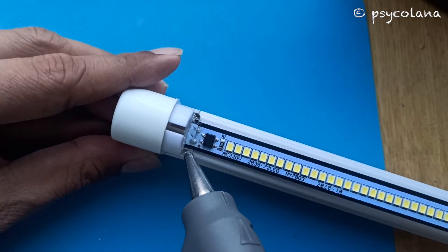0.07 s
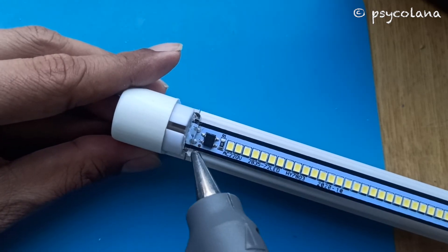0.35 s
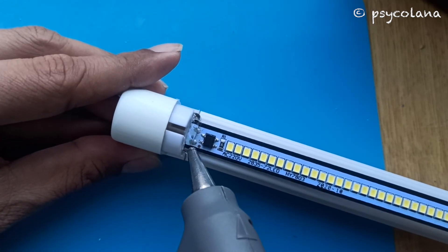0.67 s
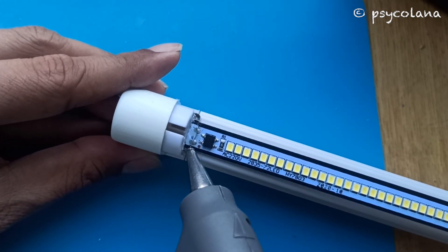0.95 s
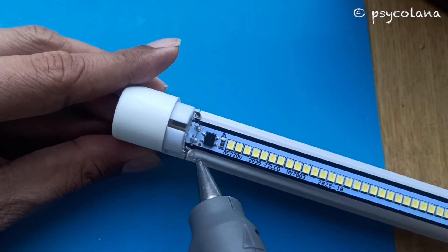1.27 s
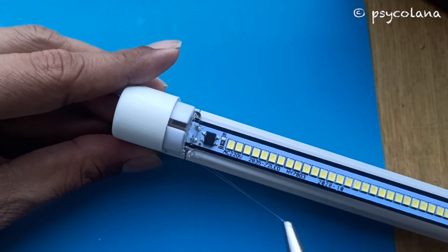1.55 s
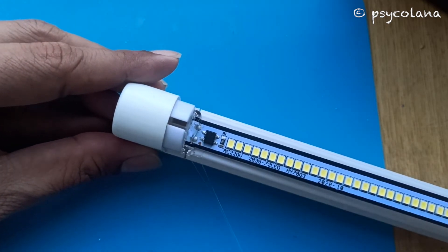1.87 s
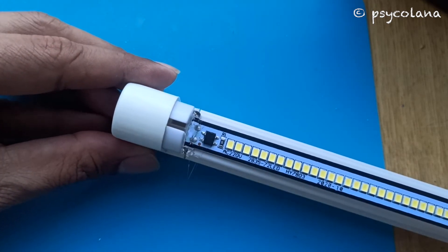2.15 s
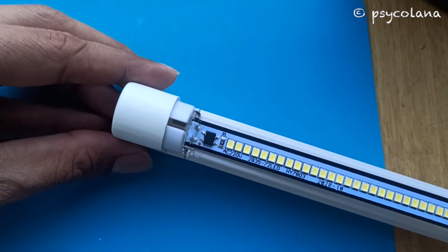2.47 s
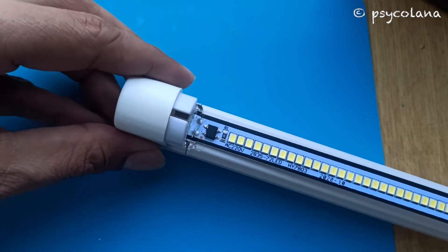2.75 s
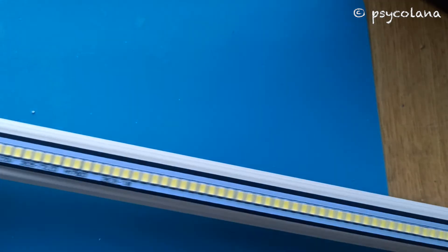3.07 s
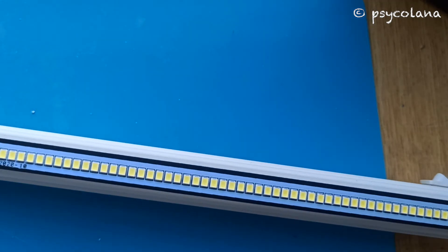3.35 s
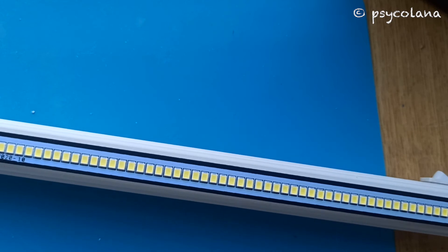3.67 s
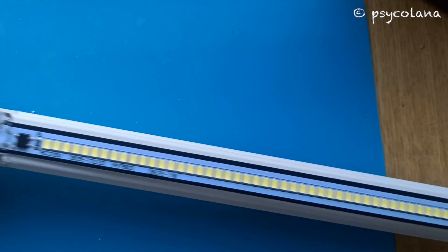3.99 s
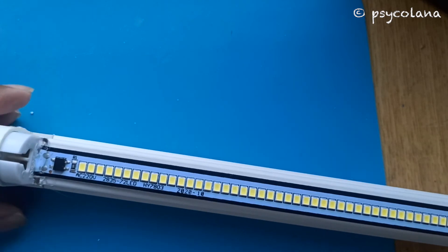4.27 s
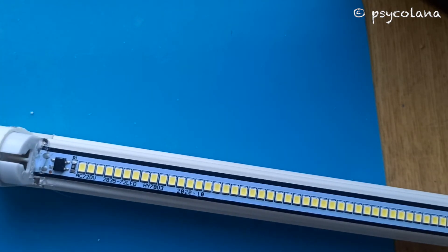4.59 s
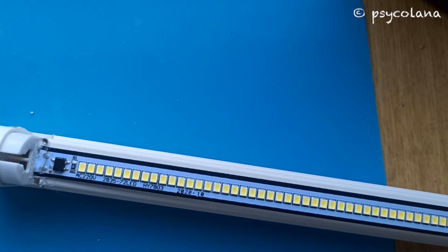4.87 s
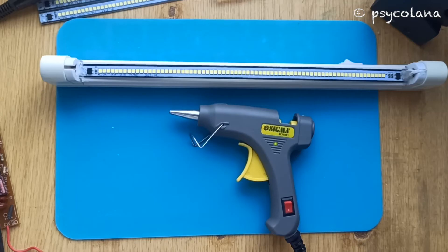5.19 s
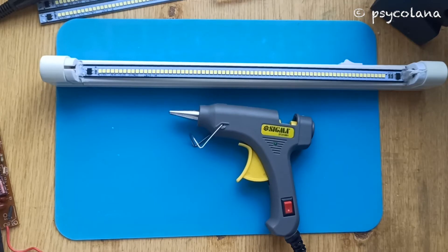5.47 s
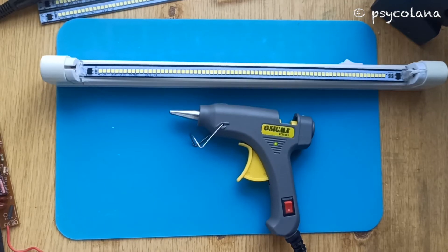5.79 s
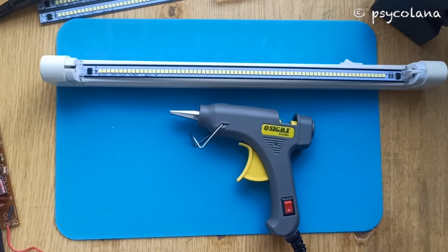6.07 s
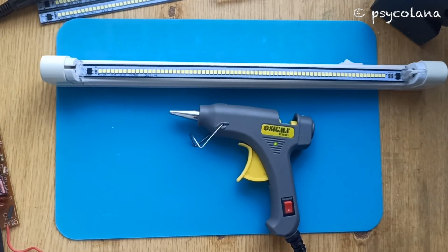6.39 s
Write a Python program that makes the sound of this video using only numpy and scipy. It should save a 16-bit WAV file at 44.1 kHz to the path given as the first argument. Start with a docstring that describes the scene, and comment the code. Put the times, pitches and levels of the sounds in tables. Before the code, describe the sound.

A hot glue gun ticks faintly on a plastic tube, which then slides over a rubber mat and lands with a hollow knock.

```python
"""A quiet room: a hot glue gun dabs at a plastic tube lamp holder on a rubber mat, heard close up.
The nozzle ticks on the thin shell. Fingers scrape and shift the holder; it sticks and slips over
the mat and is set down with a hollow knock. Skin and sleeves rustle faintly over the room's low
rumble and the microphone's hiss."""
import sys
import numpy as np
from scipy import signal
from scipy.fft import rfft, irfft
from scipy.io import wavfile
from scipy.ndimage import uniform_filter1d

SR = 44100
rng = np.random.default_rng(int(sys.argv[2]) if len(sys.argv) > 2 else 0)


def transcribe(u):
    """Save the signal u as a 16-bit wav file named by the first command-line argument.

    u: samples, shape (n,) or (channels, n), limited to [-1, 1]; the rate is SR.
    q: integer samples, one column per channel.
    """
    v = np.clip(np.atleast_2d(u).T, -1, 1)
    q = np.round(v * 32767).astype(np.int16)
    wavfile.write(sys.argv[1], SR, q)


N = 287972
TIME = np.arange(N) / SR
SIDES = np.array([[.5], [-.5]])  # splits a left-right difference

# left-right likeness of diffuse sound: freq_hz, correlation
COHERENCE = [(30, 0.44), (70, 0.032), (150, 0.86), (300, 0.3), (600, 0.099), (1200, 0.029), (16000, 0.012)]


def amp(db):
    """Decibels to gain."""
    return 10 ** (np.asarray(db) / 20)


def unit(x):
    """Scales to rms 1."""
    return x / np.sqrt(np.mean(x ** 2) + 1e-20)


def curve_at(points, hz):
    """Interpolates on a log-frequency axis."""
    freq_hz, value = np.transpose(points)
    return np.interp(np.log(hz + 1), np.log(freq_hz + 1), value)


def add(mix, start_s, sound):
    """Mixes a sound in at start_s."""
    part = mix[:, round(start_s * SR):][:, :sound.shape[1]]
    part += sound[:, :part.shape[1]]


def colour(x, spectrum, tilt_db_oct=0):
    """Filters by a spectrum, tilted about 4 kHz."""
    hz = np.fft.rfftfreq(x.shape[-1], 1 / SR)
    octaves = np.log2(np.maximum(hz, 800) / 4000)
    return irfft(rfft(x) * amp(curve_at(spectrum, hz) + tilt_db_oct * octaves), x.shape[-1])


def diffuse_noise(spectrum):
    """Stereo noise, partly alike in the bass, unrelated in the treble."""
    # left-right balance: freq_hz, pan_db
    balance = [(50, 0.5), (200, 0.6), (1000, 0.5), (2500, -1), (5000, 3), (14000, 4.5)]
    hz = np.fft.rfftfreq(N, 1 / SR)
    left, other = rfft(rng.standard_normal((2, N)))
    same = curve_at(COHERENCE, hz)
    right = same * left + np.sqrt(1 - same ** 2) * other
    pair = np.array([left, right]) * amp(SIDES * curve_at(balance, hz))
    return unit(irfft(pair * amp(curve_at(spectrum, hz)), N))


def wander(n, per_s):
    """Random curve through per_s Gaussian knots a second."""
    knots = rng.standard_normal(int(n / SR * per_s) + 3)
    return np.interp(np.arange(n) / SR * per_s, np.arange(len(knots)), knots)


def stroke(t, peak_s, level_db, swell_s, fade_s):
    """Bell envelope with separate swell and fade."""
    return amp(level_db) * np.exp(-((t - peak_s) / np.where(t < peak_s, swell_s, fade_s)) ** 2)


def resonate(x, hz, width_hz):
    """Resonance that follows the curve hz."""
    carrier = np.exp(2j * np.pi * np.cumsum(hz) / SR)
    pole = np.exp(-np.pi * width_hz / SR)
    return 2 * (carrier * signal.lfilter([1 - pole], [1, -pole], x / carrier)).real


def background(rumble_db=-54.5, hiss_db=-64, drop_db=-5.5, drop_at_s=2.435, drop_takes_s=0.0057,
               rise_db_per_s=0.18, waver_db=0.7):
    """Room rumble creeps up, microphone hiss swells at the end; both step down once, together."""
    # room tone: freq_hz, gain_db
    rumble_spectrum = [(15, -39), (25, -31), (45, -15.5), (80, -5), (130, -3), (168, 0.93), (250, -7),
                       (330, -8), (480, -13.5), (750, -15), (1100, -19.5), (2300, -25.5), (4500, -25.5),
                       (7000, -26.5), (8400, -31), (11000, -44)]
    # microphone hiss: freq_hz, gain_db
    hiss_spectrum = [(8000, -19), (11000, -2), (12500, -14), (13500, -7.5), (16000, -21.5)]
    since_s = TIME - drop_at_s
    step_db = drop_db * np.clip(since_s / drop_takes_s + .5, 0, 1)
    rumble = diffuse_noise(rumble_spectrum)
    rumble *= amp(rumble_db + step_db + rise_db_per_s * since_s + waver_db * wander(N, per_s=11))
    swell = stroke(TIME, peak_s=7.5, level_db=-69, swell_s=1, fade_s=0.18)
    return rumble + diffuse_noise(hiss_spectrum) * (amp(hiss_db + step_db) + swell)


def holder_body(force, rise_s=0.0067, highpass_hz=105, split_hz=500):
    """The hollow holder's low modes reach each microphone port with their own phase and level."""
    # body modes: freq_hz, relative_db, t60_s, port_phase_rad, pan_db
    modes = [(109, -40, 0.13, .1, -1), (177.5, -7, 0.046, 0.17, 2.5), (256, -4.5, 0.031, 0.27, 1.5),
             (311.3, 4.5, 0.021, 0.73, 3.5), (366.7, -2.5, 0.031, 0.99, 1.5), (417, -17.5, 0.08, 1.8, 1),
             (626, -13.5, 0.045, 1.5, 3), (694, -8.5, 0.034, 1.5, -2.5)]
    t = np.arange(SR // 2) / SR
    ring = np.zeros((2, len(t)))
    for hz, db, t60_s, phase_rad, pan_db in modes:
        polarity = np.sign(split_hz - hz)  # upper modes swing against the lower ones
        envelope = amp(db + SIDES * pan_db - 60 * t / t60_s)
        ring += polarity * envelope * np.sin(2 * np.pi * hz * t + SIDES * phase_rad)
    # a small body radiates little deep bass
    highpass = signal.butter(3, highpass_hz, "high", fs=SR, output="sos")
    ring = signal.sosfilt(highpass, ring * (1 - np.exp(-t / rise_s)))
    return signal.fftconvolve(force[None], ring / abs(ring).max(), axes=1)[:, :len(force)]


def knocks(gain_db=4.5, gap_s=0.0112, gap_scatter=0.125, bounce_db=-8, bounce_fade_db=-17):
    """Rubber cushions each bump to a half-sine push; longer contact is duller, glancing bumps chatter."""
    # holder on mat: start_s, relative_db, contact_ms, chatter_s
    bumps = [(0.336, -33.5, 4.2, 0.009), (0.436, -37, 3, 0.08), (0.555, -41, 3.1, 0.072),
             (2.659, -49, 0.68, 0.0011), (2.7114, -42.5, 1.2, 0.0027), (2.82, -49.5, 0.91, 0.015),
             (2.894, -44.5, 2.14, 0.05), (3.130, -30, 1.7, 0.16), (3.1885, -35.5, 1.26, 0.024),
             (3.62, -49, 0.68, 0.065), (3.922, -38.5, 2, 0.082), (3.9376, -35, 1.4, 0.019),
             (4.0937, -25.5, 1.72, 0.061), (4.1078, -30.5, 1.5, 0.068), (4.1436, -13, 1.47, 0)]
    force, t = np.zeros((1, N)), np.arange(512) / SR
    gaps_s = gap_s * np.exp(gap_scatter * rng.standard_normal((len(bumps), 16)))
    for (start_s, db, contact_ms, chatter_s), delays_s in zip(bumps, np.cumsum(gaps_s, axis=1)):
        push = np.sin(np.pi * np.minimum(t * 1000 / contact_ms, 1))
        push = amp(db) * push[None] / push.sum()
        add(force, start_s, push)
        for delay_s in delays_s[delays_s < chatter_s]:
            rebound = push * amp(bounce_db + bounce_fade_db * (delay_s / chatter_s) ** 2)
            add(force, start_s + delay_s, rebound)
    return amp(gain_db) * holder_body(force[0])


def clicks(gain_db=13, ring_db=-30, snap_db=-1, rise_share=0.14, spot_width_oct=0.36):
    """Nozzle, nails and loose parts tick: tiny contacts around one snap, then a brief shell ring."""
    # ticks: start_s, relative_db, tilt_db_oct, t60_s, pan_db, spot_hz, spot_boost_db
    ticks = [(0.5227, -46, -3, 0.0055, 2.5, 1100, 7), (0.5342, -57, -5, 0.0066, -1, 2000, 12),
             (0.994, -46, 11, 0.0084, 0, 2100, 16), (1.359, -54, 9, 0.0062, 3, 7500, 1),
             (1.358, -43, -1.5, 0.015, 5, 1100, 9), (1.3627, -41, -1, 0.011, 4, 6600, 3),
             (1.385, -57, -5, 0.011, -6, 1300, 11), (1.4703, -56, -5, 0.02, 0, 2280, 11),
             (2.7123, -60, -5, 0.008, -3, 650, 6), (2.8248, -47.5, 2.5, 0.0112, 3, 4200, 3.5),
             (2.9248, -52, -2, 0.037, 0, 6960, 9), (2.945, -49.5, 5, 0.0162, 4, 3800, 5),
             (3.129, -41.5, -3.5, 0.0094, -3, 3920, 2), (3.198, -50, -1, 0.017, 0, 4000, 4.5),
             (3.2486, -50, 3, 0.035, 1, 4170, 2.5), (3.481, -56, 1, 0.032, 9, 2620, 9),
             (3.62, -52.5, 3.5, 0.0061, 4, 13200, 5), (3.9213, -49, 4, 0.035, 4.5, 7400, 1),
             (4.0715, -48, -1.5, 0.036, 2.5, 3700, 11), (4.074, -50, 6, 0.021, 7, 14100, 5),
             (4.0923, -51, -7.5, 0.017, -2, 3550, 19), (4.1429, -23.8, -4, 0.0095, -1, 1700, 3.5),
             (4.1485, -43.5, 3, 0.0097, 0, 4200, 6), (4.262, -47, 2, 0.012, 0, 7140, 5),
             (5.876, -46, -1.5, 0.021, 0, 3300, 0.5)]
    # thin shell's modes: freq_hz, relative_db, t60_s
    shell_modes = [(830, -11, 0.068), (1190, 5.5, 0.044), (1880, -4, 0.042), (2530, 5, 0.028),
                   (3270, 2, 0.028), (3630, 1, 0.035), (3700, -11.5, 0.044), (3880, -13, 0.11),
                   (4880, 0, 0.062), (7100, 2, 0.029), (7960, 13, 0.028)]
    # contact spectrum: freq_hz, gain_db
    spectrum = [(60, -12), (200, -1), (480, -2), (700, 0), (1150, -10), (1750, -0.5), (2800, -3), (4300, 1),
                (5300, -7), (6900, 0.5), (7500, -4.5), (9000, -18), (13000, -12), (16000, -19)]
    out, lead = np.zeros((2, N)), 128
    t = np.maximum(np.arange(4096) - lead, 0) / SR
    bins_hz = np.fft.rfftfreq(len(t), 1 / SR) + 1
    for start_s, db, tilt_db_oct, t60_s, pan_db, spot_hz, spot_boost_db in ticks:
        rise_s = rise_share * t60_s
        crack = rng.standard_normal((2, len(t))) * amp(-60 * t / t60_s)
        ring = sum(amp(mode_db - 60 * t / ring_s) * np.sin(2 * np.pi * (hz * t + rng.random((2, 1))))
                   for hz, mode_db, ring_s in shell_modes)
        snap = amp(snap_db) * (np.arange(len(t)) == lead + round(rise_s * SR))
        attack = 1 - np.exp(-t / rise_s)
        click = colour(snap + (crack + amp(ring_db) * ring) * attack, spectrum, tilt_db_oct)
        # each struck spot has its own pitch
        resonance_db = spot_boost_db * np.exp(-(np.log2(bins_hz / spot_hz) / spot_width_oct) ** 2)
        click = irfft(rfft(click) * amp(resonance_db))
        add(out, start_s - lead / SR, click * amp(db + SIDES * pan_db))
    return amp(gain_db) * out


def scrapes(grain_db=3, catch_db=2, squeak_drift=0.054, squeak_width_hz=260, lead_s=0.4):
    """Fingers and plastic catch unevenly; a squeak wanders in pitch as the contact moves."""
    # dry strokes: peak_s, level_db, swell_s, fade_s, tilt_db_oct, squeak_hz, squeak_over_grit_db
    strokes = [(0.537, -60, 0.0091, 0.01, -2, 4700, 11), (1.368, -57, 0.0146, 0.016, 4, 2340, 0),
               (2.25, -63, 0.028, 0.063, -7, 2280, -2), (2.925, -55, 0.062, 0.039, 1.5, 3750, -11),
               (3.16, -59, 0.039, 0.14, -3, 3600, -19), (3.928, -55.5, 0.033, 0.037, -2.5, 3400, -13),
               (4.078, -56, 0.0064, 0.011, 3, 3600, -3), (4.106, -49, 0.014, 0.028, -1.5, 2480, -8),
               (4.152, -57, 0.016, 0.064, -4.5, 1250, -13), (5.885, -58.5, 0.0041, 0.027, 3, 3120, -5),
               (6.377, -63.5, 0.017, 0.02, -5, 4240, -2)]
    # grit spectrum: freq_hz, gain_db
    spectrum = [(300, 5), (800, 2.5), (1400, -0.5), (2300, -3), (3700, 1.5), (5300, 0), (7500, -3.5),
                (9000, -9), (16000, -18)]
    out, t = np.zeros((2, N)), TIME[:SR]
    for peak_s, db, swell_s, fade_s, tilt_db_oct, squeak_hz, squeak_db in strokes:
        grip = amp(grain_db * wander(SR, per_s=600) + catch_db * wander(SR, per_s=130))
        grit = unit(colour(rng.standard_normal((2, SR)) * grip, spectrum, tilt_db_oct))
        pitch_hz = squeak_hz * (1 + squeak_drift * wander(SR, per_s=50))
        squeak = unit(resonate(grit, pitch_hz, squeak_width_hz))
        pressure = stroke(t, lead_s, db, swell_s, fade_s)
        add(out, peak_s - lead_s, unit(grit + amp(squeak_db) * squeak) * pressure)
    return out


def drags(jitter=0.0699, uneven_db=2, lowpass_hz=210, settle_s=0.012, early_speedup=0.44,
          grit_swing_db=7):
    """Plastic sticks and slips on rubber: fast and gritty at first, then a slower, cleaner judder."""
    # holder slides: peak_s, level_db, swell_s, fade_s, settled_slip_hz, mid_grit_db
    slides = [(1.768, -51.5, 0.094, 0.18, 128, 3.5), (1.94, -51, 0.019, 0.155, 119, -6),
              (2.242, -57, 0.094, 0.065, 148, -4), (3.158, -42.5, 0.028, 0.1, 200, 8.5),
              (3.698, -48, 0.21, 0.21, 120, 3.5)]
    lowpass = signal.butter(2, lowpass_hz, fs=SR, output="sos")
    friction = signal.sosfilt(lowpass, holder_body(rng.standard_normal(N)))
    # steady hand pressure keeps the friction even
    friction /= np.sqrt(uniform_filter1d((friction ** 2).mean(0), size=1300) + 1e-12)
    pace = 1 + jitter * wander(N, per_s=160)
    grip = unit(amp(uneven_db * wander(N, per_s=110)))
    out = np.zeros((2, N))
    for peak_s, db, swell_s, fade_s, settled_slip_hz, mid_grit_db in slides:
        early = np.tanh((peak_s - TIME) / settle_s)  # 1 before the peak, -1 after
        grit = amp(mid_grit_db + grit_swing_db * early)
        slip_hz = settled_slip_hz * (1 + early_speedup * (1 + early) / 2) * pace
        rocking = np.sqrt(2) * np.sin(2 * np.pi * np.cumsum(slip_hz) / SR) * grip
        judder = (rocking + grit * friction) / np.hypot(1, grit)
        out += judder * stroke(TIME, peak_s, db, swell_s, fade_s)
    return out


def rubs(grain_db=2, uneven_db=1.4):
    """Skin and sleeves rustle, grainy as skin ridges catch, uneven as pressure shifts."""
    # hand movements: peak_s, level_db, swell_s, fade_s
    moves = [(2.25, -53.5, 0.0307, 0.027), (2.32, -59.5, 0.175, 0.076), (3.19, -62, 0.027, 0.041),
             (3.915, -63.5, 0.052, 0.039), (4.18, -65, 0.055, 0.075), (4.5, -66.5, 0.095, 0.11),
             (5.49, -60.5, 0.0593, 0.039), (5.85, -63.5, 0.29, 0.23), (6.15, -60.5, 0.15, 0.6),
             (6.38, -64.5, 0.0476, 0.035)]
    # rustle spectrum: freq_hz, gain_db
    spectrum = [(300, -17), (1000, -8), (2200, -6.5), (3000, -4.5), (4200, 0.5), (5300, 3), (6500, 3.3),
                (7500, 3.5), (8500, -4.5), (12000, -11), (14000, -5), (16000, -9)]
    pressure = sum(stroke(TIME, *move) for move in moves)
    rustle = diffuse_noise(spectrum)
    grip = amp(grain_db * wander(N, per_s=350) + uneven_db * wander(N, per_s=30))
    return pressure * unit(rustle * grip)


def reflections(x, level_db=-16, build_s=0.0028, density=0.08):
    """Small furnished room: sparse echoes, each band dying at its own rate."""
    # room decay: freq_hz, t60_s
    decay = [(100, 0.32), (300, 0.37), (700, 0.2), (2000, 0.23), (7000, 0.12), (15000, 0.07)]
    taps = rng.standard_normal((2, SR // 2)) * (rng.random((2, SR // 2)) < density)
    hz, t, bands = signal.stft(taps, SR, nperseg=256)
    same = curve_at(COHERENCE, hz)[:, None]
    bands[1] = same * bands[0] + np.sqrt(1 - same ** 2) * bands[1]
    envelope = amp(-60 * t / curve_at(decay, hz)[:, None]) * (1 - np.exp(-t / build_s))
    tail = signal.istft(bands * envelope, SR, nperseg=256)[1]
    tail *= amp(level_db) / np.linalg.norm(tail[0])
    return signal.fftconvolve(x.mean(0)[None], tail, axes=1)[:, :N]


def scene():
    """Impacts and their reflections, over friction and the quiet room."""
    impacts = knocks() + clicks()
    return impacts + reflections(impacts) + drags() + scrapes() + rubs() + background()


def record(dry):
    """Overall tone colour, then the band limit."""
    # tone colour, dip near 5 kHz, deep gap near 9-11 kHz: freq_hz, gain_db
    tone_colour = [(20, 1.5), (4600, -1.5), (4950, -8.5), (5800, -7.5), (6300, 1.5), (8300, 3),
                   (8900, -25.5), (10000, -24.5), (11250, -30), (11600, -6), (16000, 5)]
    edge_hz = 15850
    lowpass = signal.firwin(511, edge_hz, window=("kaiser", 9), fs=SR)
    return signal.oaconvolve(colour(dry, tone_colour), lowpass[None], "same")


dry = scene()
out = record(dry)
transcribe(out)
```